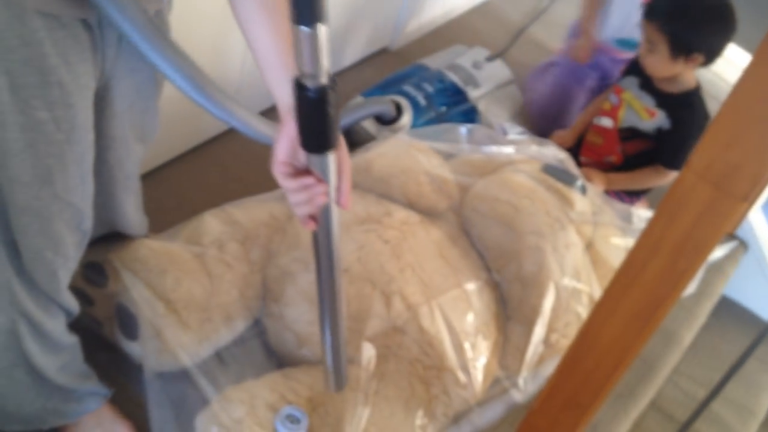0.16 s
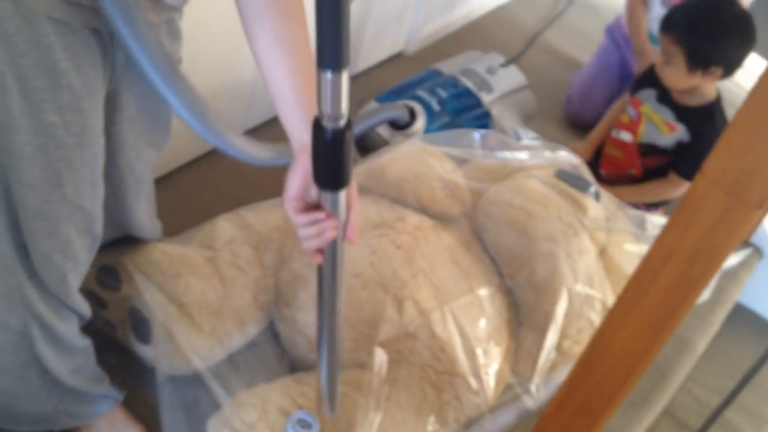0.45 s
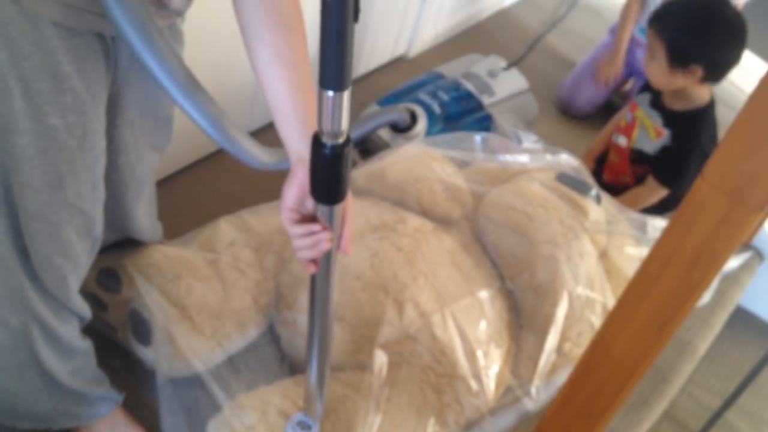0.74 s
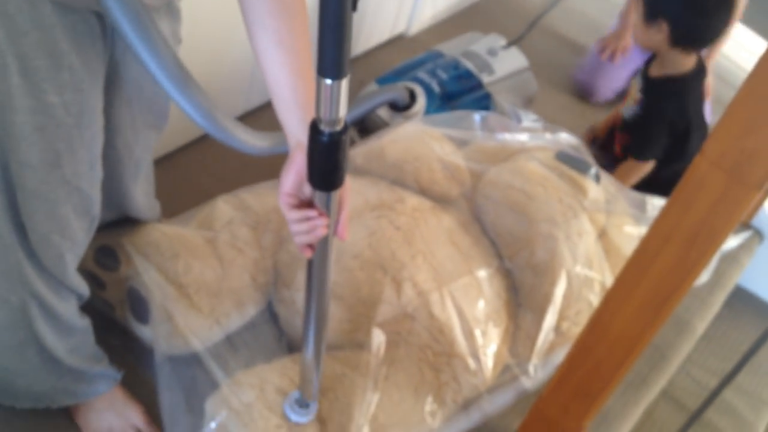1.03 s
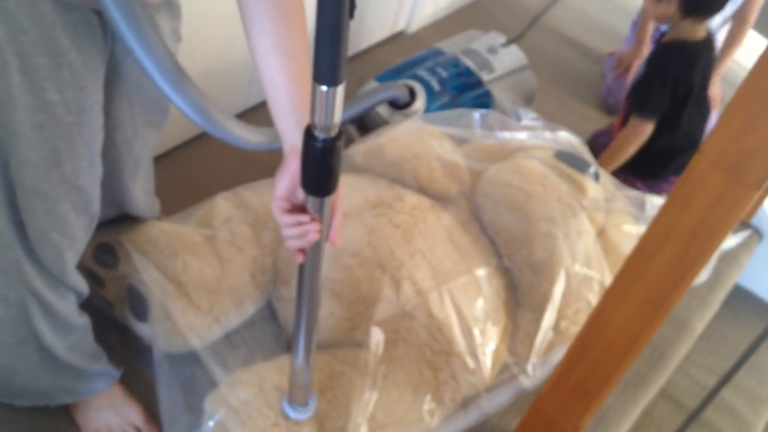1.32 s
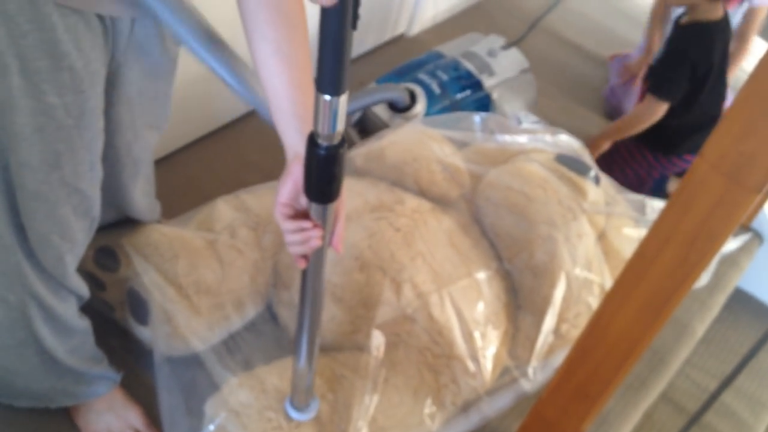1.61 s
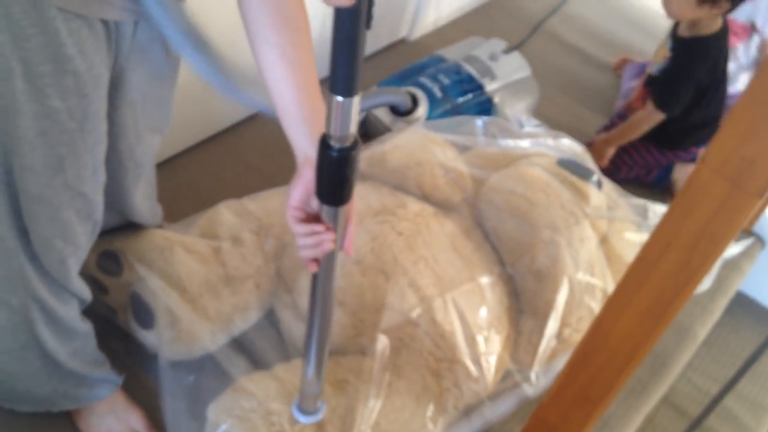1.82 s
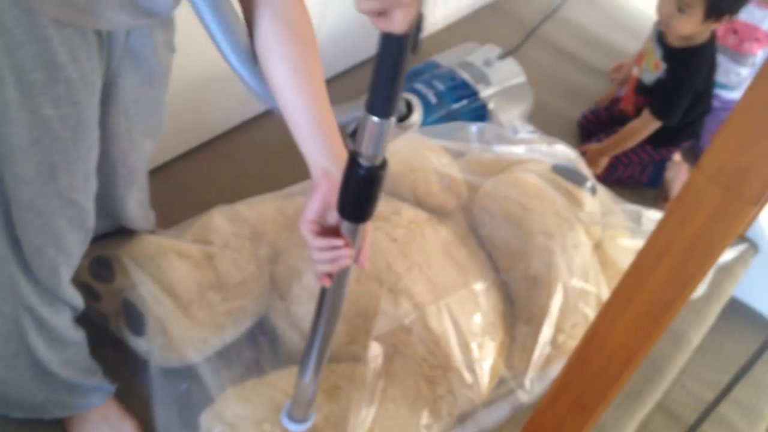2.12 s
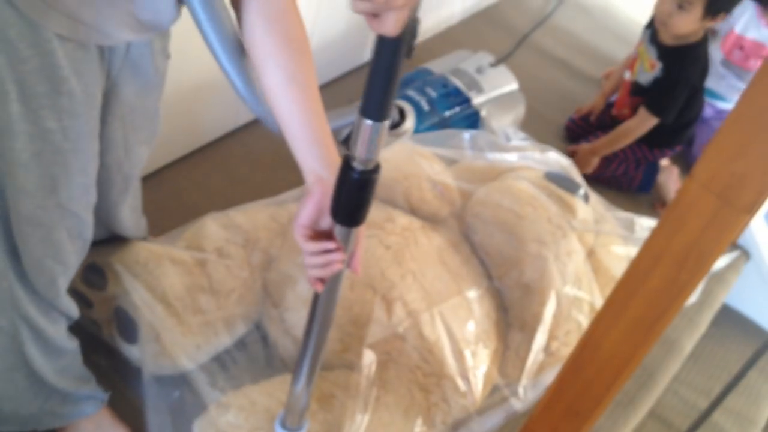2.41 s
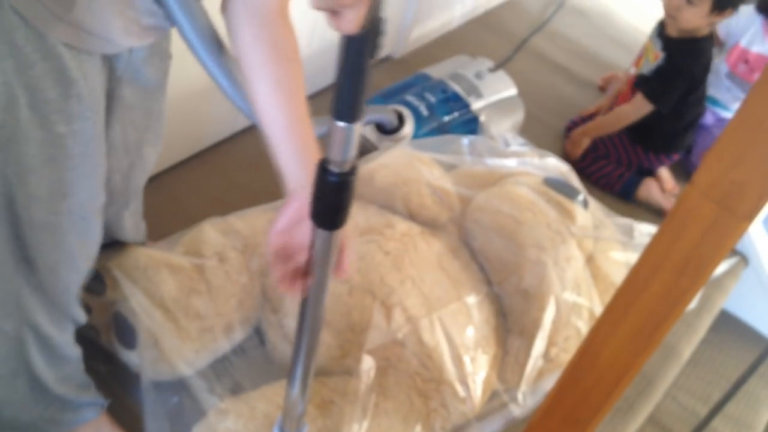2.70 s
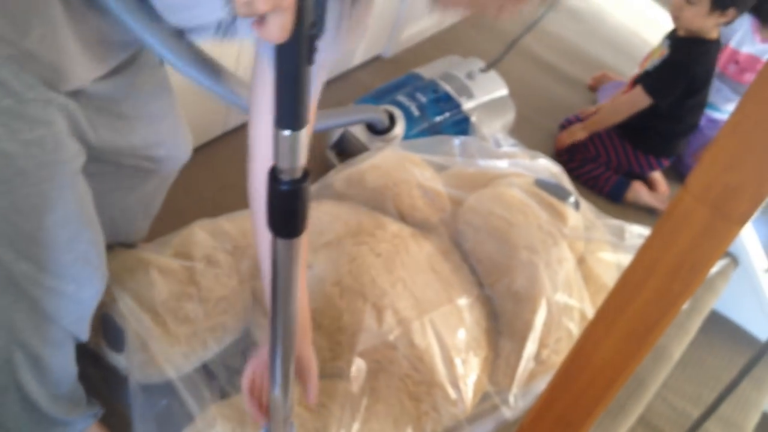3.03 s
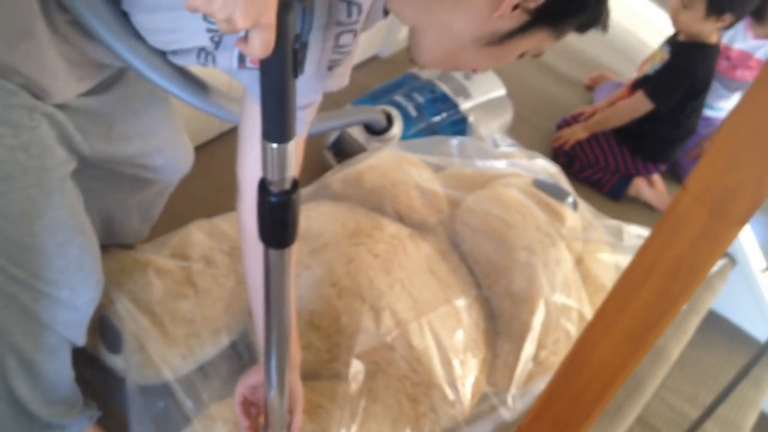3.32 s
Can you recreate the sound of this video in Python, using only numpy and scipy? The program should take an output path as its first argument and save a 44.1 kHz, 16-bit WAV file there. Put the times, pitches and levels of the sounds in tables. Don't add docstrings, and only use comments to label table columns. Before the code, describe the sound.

A vacuum cleaner runs throughout, its broad airy roar and faint high whine swelling slightly around 1 second. At 1.47 the wand knocks the storage bag's valve and a bright, whistling air leak bursts out. At 1.87 it snaps home with a loud, sharp clack; the leak dies by 2.0. The motor pitch climbs, leaving darker low airflow, strong high hiss, faint fluttering buzz and soft bag thumps until 3.4. Close, mono, small dry room.

```python
import sys
import numpy as np
from scipy import signal
from scipy.fft import rfft, irfft
from scipy.io import wavfile
from scipy.ndimage import uniform_filter1d

SR = 44100
rng = np.random.default_rng(int(sys.argv[2]) if len(sys.argv) > 2 else 0)


def undo_db(level):
    steps = np.asarray(level, float) / 20
    return 10 ** steps


def output_pcm(signal):
    pcm = np.clip(np.atleast_2d(signal).T, -1, 1) * 32767
    wavfile.write(sys.argv[1], SR, np.round(pcm).astype(np.int16))


N = 152586
T = np.arange(N) / SR
SEAM_HZ = 3300


def level(x, db):
    return x * undo_db(db) / np.sqrt(np.mean(x ** 2))


def walk(rate_hz):
    hold = int(SR / rate_hz)
    steps = np.repeat(rng.standard_normal(N // hold + 1), hold)
    smooth = uniform_filter1d(uniform_filter1d(steps, hold), hold)
    return 1.3 * smooth[:N]


def curve(table, column):
    rows = np.array(table)
    return np.interp(T, rows[:, 0], rows[:, column])


def air(colour, low_hz, high_hz, flicker_db, swell_db):
    log_hz = np.log(np.maximum(np.fft.rfftfreq(N, 1 / SR), 1))
    low, high = np.log(low_hz), np.log(high_hz)
    colour_hz, colour_db = np.array(colour).T
    spectrum = rfft(rng.standard_normal(N)) * undo_db(np.interp(log_hz, np.log(colour_hz), colour_db))
    spectrum = spectrum * (log_hz >= low) * (log_hz < high)
    out = np.zeros(N)
    step = np.log(2) / 2
    for centre in np.arange(low, high + step, step):
        window = np.clip(1 - abs(log_hz - centre) / step, 0, 1)
        out += irfft(spectrum * window, N) * undo_db(flicker_db * walk(8.95) + swell_db)
    return level(out, 0)


def band(hz, width_hz):
    radius = np.exp(-np.pi * width_hz / SR)
    poles = [1, -2 * radius * np.cos(2 * np.pi * hz / SR), radius * radius]
    return level(signal.lfilter([1, 0, -1], poles, rng.standard_normal(N)), 0)


def ring(modes, spread):
    t = T[:SR // 3, None]
    hz, db, t60_s = np.array(modes).T
    detune, delay = rng.standard_normal((2, len(modes)))
    late = np.maximum(t - 0.00039 * abs(delay), 0)
    decay = undo_db(db) * np.exp(-np.log(1000) * late / t60_s)
    blow = (decay * np.sin(2 * np.pi * hz * (1 + spread * detune) * late)).sum(axis=1)
    return blow / abs(blow).max()


def room(x, wet_db):
    t60_s = .22
    t = T[:SR // 3]
    tail = rng.standard_normal(len(t)) * np.exp(-np.log(1000) * t / t60_s) * (t > .002)
    tail = signal.lfilter([1], [1, -.3], tail)
    tail = tail / np.sqrt(np.sum(tail ** 2))
    return x + undo_db(wet_db) * signal.fftconvolve(x, tail)[:N]


def motor():
    # time in seconds, shaft rate in Hz, shaft hum in dB.
    shaft = [(0, 489.4, -55.5), (1.47, 492.3, -55.5), (1.56, 494, -71), (1.7, 502, -56), (1.86, 511, -57),
             (1.95, 516, -60), (2.1, 522.4, -58), (2.25, 527, -60.5), (2.54, 532.2, -56.5),
             (2.9, 534, -55.5), (3.46, 536, -56)]
    # time in seconds, first and second blade tone in dB.
    blade_tones = [(0, -55, -60), (.55, -55, -63), (.8, -54, -48), (1.05, -51, -59), (1.4, -47, -52),
                   (1.6, -52, -52), (1.9, -49, -50), (1.945, -60, -30), (1.98, -54, -55), (2.04, -51, -41),
                   (2.1, -63, -53), (2.22, -47, -51), (2.32, -64, -45), (2.45, -46.5, -58),
                   (2.68, -37.5, -57), (2.88, -49, -50), (3.1, -54, -44), (3.3, -54.5, -56)]
    blades, flicker_db = 9, 1.2
    phase = 2 * np.pi * np.cumsum(curve(shaft, 1)) / SR
    hum = undo_db(curve(shaft, 2)) * np.sin(phase)
    hum = hum + undo_db(-65.5 + 3.1 * walk(7.9)) * np.sin(2 * phase)
    mains = undo_db(-77) * np.sin(2 * np.pi * 99 * T)
    first = undo_db(curve(blade_tones, 1) + flicker_db * walk(25.14)) * np.sin(blades * phase)
    second = undo_db(curve(blade_tones, 2) + flicker_db * walk(25.2)) * np.sin(2 * blades * phase)
    return np.sqrt(2) * (hum + mains + first + second)


def roar():
    # frequency in Hz, spectral level in dB.
    open_low = [(30, -46), (80, -39), (120, -31), (150, -17), (241, -4), (600, -11), (1000, -5), (1700, -5),
                (2300, -1.5), (2750, -6), (3300, -12.5)]
    open_high = [(3300, -11.5), (4300, -7), (6000, -12.5), (7500, 1.5), (8700, 2), (10000, -4), (13000, -6),
                 (13700, -14), (15800, -22)]
    seated_low = [(30, -45), (80, -33), (157, -7), (300, -7.5), (900, -9), (1100, -5), (1790, -2),
                  (2400, -2), (3300, -8)]
    seated_high = [(3300, -12.5), (4600, -10.5), (5600, -13.5), (6600, -9), (8200, 2.5), (9500, -1),
                   (13300, -5.5), (14300, -15), (15800, -18)]
    touch_s, choke_s, top_hz = 1.468, .032, 17000
    shut = np.clip((T - touch_s) / choke_s, 0, 1)
    near_db = 4.6 * (np.interp(T, (0.75, 1.15), (0, 1)) - .5)
    tighten_db = .9 * (T - 2.7)
    swell_db = .5 * walk(3.23)
    free = undo_db(-42.5 + near_db) * air(open_low, 24.8, SEAM_HZ, 1.0, swell_db)
    free = free + undo_db(-39) * air(open_high, SEAM_HZ, top_hz, 1.0, swell_db)
    choked = undo_db(-45.5) * air(seated_low, 37.0, SEAM_HZ, 0.81, swell_db)
    choked = choked + undo_db(-35.5 + tighten_db) * air(seated_high, SEAM_HZ, top_hz, 1.0, swell_db)
    return np.sqrt(1 - shut) * free + np.sqrt(shut) * choked


def leak():
    # frequency in Hz, spectral level in dB.
    jet_colour = [(2500, -19), (4600, -16), (5900, -19.5), (6600, -5.5), (8400, 2), (11000, -3),
                  (13000, -3), (13600, -14), (15800, -15)]
    # time in seconds, level in dB.
    gap = [
        (1.466, -60),
        (1.472, -29),
        (1.492, -30),
        (1.53, -27),
        (1.66, -25),
        (1.85, -26),
        (1.9, -33),
        (1.96, -44),
        (2.0, -57),
    ]
    # frequency in Hz, width in Hz, level in dB.
    whistles = [(8450, 300, -14), (8920, 220, -13), (10700, 150, -8), (11220, 240, -9), (12600, 180, -12)]
    tones = np.zeros(N)
    for hz, width_hz, db in whistles:
        tones += undo_db(db + 2.6 * walk(14.4)) * band(hz, width_hz)
    singing = np.exp(-.5 * ((T - 1.69) / .11) ** 2)
    jet = air(jet_colour, 2300, 17000, 1.24, 1.25 * walk(59.7)) + tones * singing
    return jet * undo_db(curve(gap, 1)) * (T > gap[0][0]) * (T < gap[-1][0])


def knocks():
    # time in seconds, clack peak in dB, thud peak in dB.
    blows = [
        (1.4700, -21, -36),
        (1.4758, -10.5, -37),
        (1.4795, -14, -42),
        (1.8735, -3, -27),
        (1.880, -12, -37),
        (1.887, -15, -41),
        (1.891, -22, -44),
    ]
    # frequency in Hz, level in dB, T60 in seconds.
    clack = [(1300, -8.5, 0.0076), (1850, -3, .011), (2200, -2, .009), (2700, -6, 0.0054),
             (3400, -4.5, .006), (4200, -6.5, .005), (5100, -6, .005), (6000, -8, .007), (7020, -5, .009),
             (8200, 3, .011), (10150, -9, .007), (13230, -8, .005)]
    thud = [(160, -12, .25), (258, -12, 0.069), (360, -4, 0.1), (480, -4, .05), (600, -2, .05),
            (760, -4, 0.06), (1050, -5, .04)]
    out = np.zeros(N)
    for start_s, clack_db, thud_db in blows:
        blow = undo_db(clack_db) * ring(clack, 0.041) + undo_db(thud_db) * ring(thud, 0.021)
        start = int(start_s * SR)
        out[start:start + len(blow)] += blow
    return out


def bag():
    # time in seconds, flap rate in Hz, level in dB, pocket resonance in Hz.
    flap = [(2.15, 160, -83, 850), (2.3, 167, -58, 830), (2.38, 167.5, -56.5, 700), (2.47, 169.5, -56, 660),
            (2.58, 175.8, -57, 360), (2.68, 183.2, -61, 790), (3.2, 184.1, -61, 840),
            (3.46, 186.6, -61, 800)]
    # time in seconds, level in dB, length in seconds, frequency in Hz.
    skin = [(2.51, -56, .045, 162), (2.72, -68, .04, 185), (2.82, -58, .02, 150), (2.97, -51.5, .03, 160),
            (3.12, -51, .025, 190), (3.16, -55, .02, 155), (3.279, -53.5, .045, 135)]
    seat_s = 2.1
    flap_hz = curve(flap, 1) * (1 + .002 * walk(15))
    pocket_hz = curve(flap, 3)
    phase = 2 * np.pi * np.cumsum(flap_hz) / SR
    buzz, booms = np.zeros(N), np.zeros(N)
    for k in range(2, 11):
        resonance = 1 / (1 + ((k * flap_hz - pocket_hz) / 70) ** 2)
        buzz += (1.2 / k + resonance) * undo_db(1.5 * walk(7.4)) * np.sin(k * phase)
    for time_s, db, length_s, hz in skin:
        pulse = np.exp(-.5 * ((T - time_s) / length_s) ** 2)
        booms += np.sqrt(2) * undo_db(db) * pulse * np.sin(2 * np.pi * hz * T)
    return buzz * undo_db(curve(flap, 2)) * (T > seat_s) + booms * undo_db(2.2 * walk(45))


def scene():
    bass_cut = signal.butter(4, 136, "high", fs=SR, output="sos")
    blows = signal.sosfilt(bass_cut, bag() + room(knocks(), -6.5))
    flow = room(roar() + leak(), -8.5)
    rumble = undo_db(-86) * band(81.0, 66.0)
    mono = flow + motor() + blows + rumble
    return np.array([mono, mono])


def band_limit(x):
    return signal.sosfilt(signal.butter(12, 15730, fs=SR, output="sos"), x)


def record(dry):
    return band_limit(dry)


dry = scene()
out = record(dry)
output_pcm(out)
```